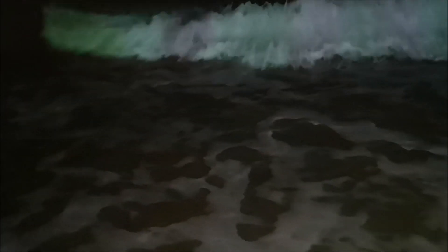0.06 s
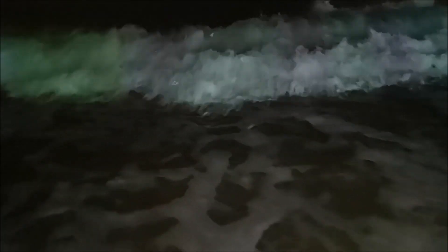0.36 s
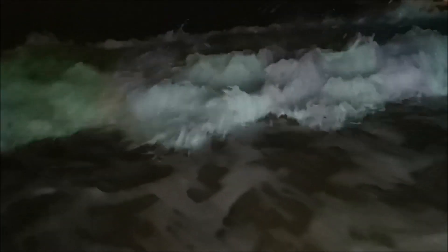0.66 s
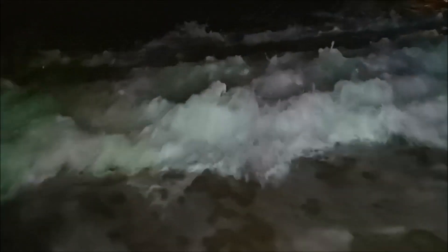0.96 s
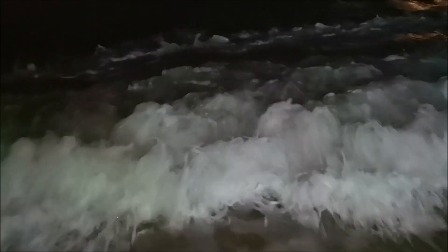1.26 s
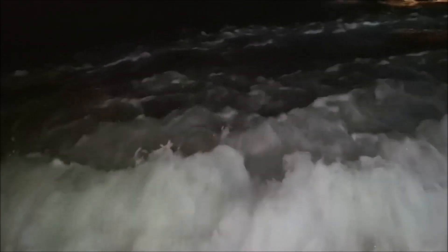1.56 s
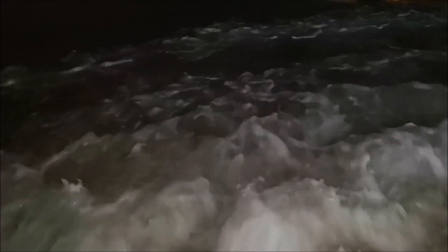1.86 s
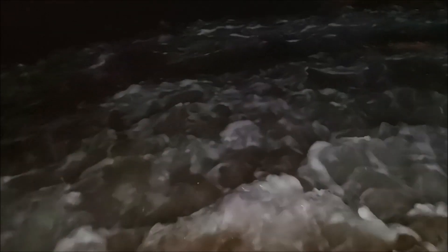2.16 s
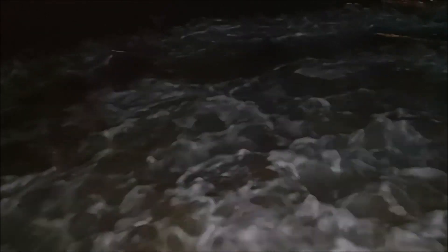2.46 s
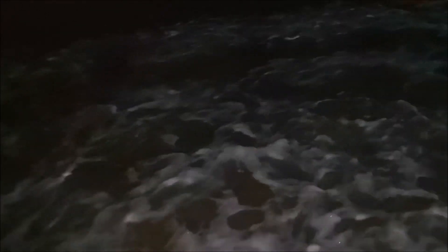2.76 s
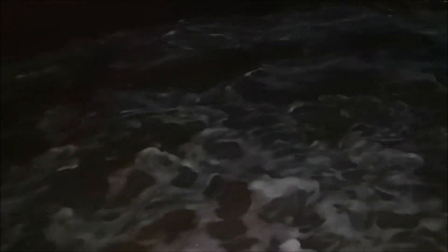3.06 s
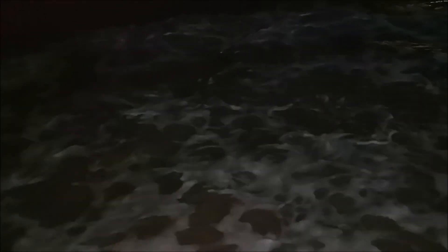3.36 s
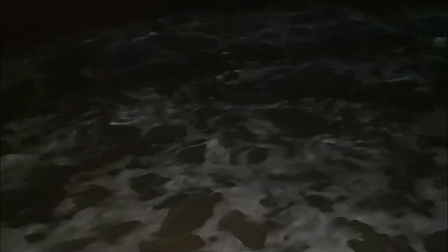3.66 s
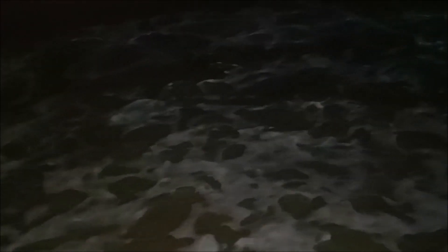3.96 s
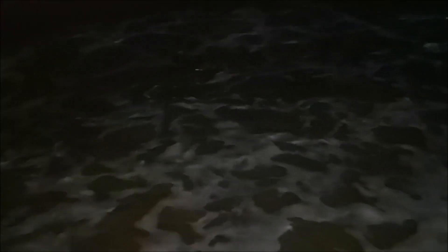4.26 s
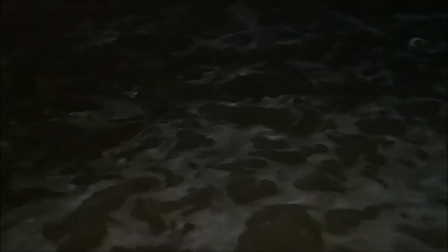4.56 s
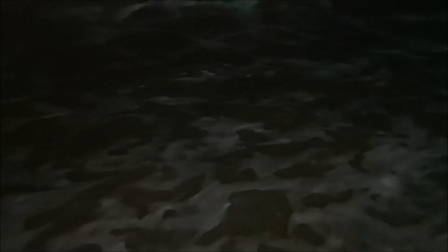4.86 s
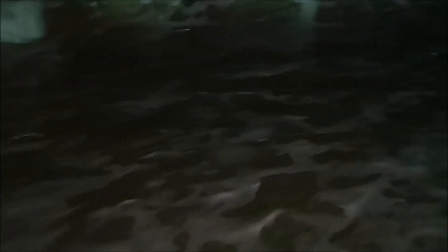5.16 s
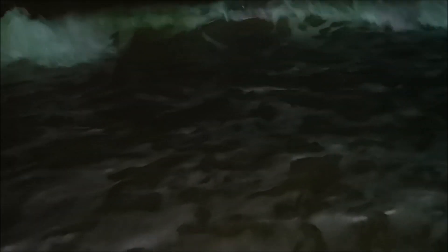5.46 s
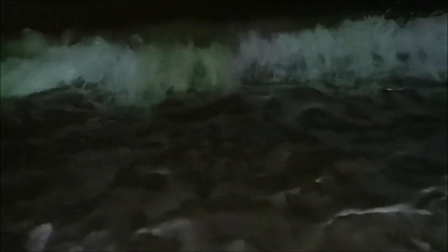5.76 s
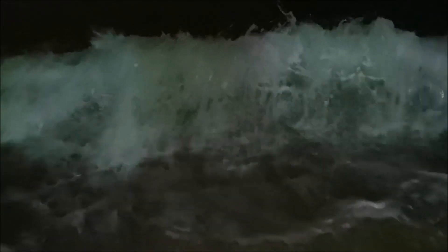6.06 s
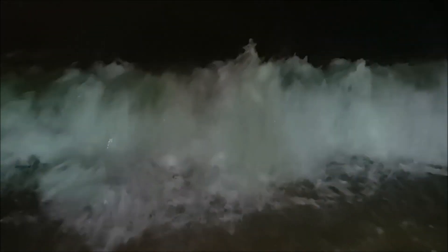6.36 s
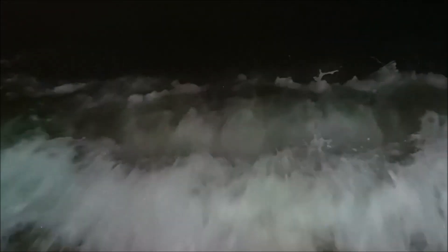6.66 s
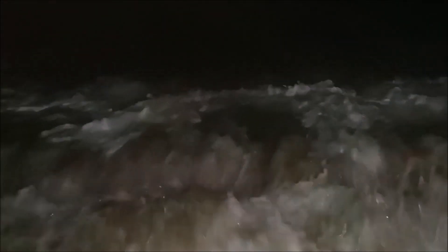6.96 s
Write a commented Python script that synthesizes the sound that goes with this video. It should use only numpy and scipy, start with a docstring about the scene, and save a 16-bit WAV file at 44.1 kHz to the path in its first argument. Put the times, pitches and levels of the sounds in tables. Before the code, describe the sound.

Waves break close by with a churning roar, wash up the shore and fizz out, then another crashes in.

```python
"""Night surf at the water's edge: a broken wave washes up the shore and fizzes out, then the next plunges.
Air in water resonates, the lower the larger its volume: big pockets thud, bubble clouds rumble, white
water roars and foam fizzes, as independent sources along a wide front. The shallows gurgle and plink
close by, and surf booms further along the shore. Two microphone ports a hand or two apart hear it,
each with its own resonances."""
import sys
import numpy as np
from scipy import signal
from scipy.fft import rfft, irfft
from scipy.io import wavfile
from scipy.ndimage import uniform_filter1d

SR = 44100
rng = np.random.default_rng(int(sys.argv[2]) if len(sys.argv) > 2 else 0)


def generate_wav(signal):
    """Clip the signal to [-1, 1] and save it as 16-bit WAV at the path in sys.argv[1]."""
    frames = np.transpose(np.atleast_2d(signal))
    scaled = np.clip(frames, -1, 1) * 32767
    pcm = np.round(scaled).astype(np.int16)
    wavfile.write(sys.argv[1], SR, pcm)


N = 317520
TIME = np.arange(N) / SR
FREQ = np.fft.rfftfreq(N, 1 / SR)


def undb(db):
    """Amplitude ratio of a level in decibels."""
    return 10 ** (np.asarray(db) / 20)


def curves(table):
    """Linear interpolation of a table's columns in time."""
    times, *columns = np.transpose(table)
    return [np.interp(TIME, times, column) for column in columns]


def colour(x, spectrum):
    """Spectral shaping by (f/Hz, level/dB) points, falling 12 dB an octave beyond the ends."""
    hz, db = np.transpose(spectrum)
    inside = np.clip(FREQ, hz[0], hz[-1])
    skirt = (np.minimum(FREQ, inside) / np.maximum(FREQ, inside)) ** 2
    return irfft(rfft(x) * skirt * undb(np.interp(np.log(inside), np.log(hz), db)), N)


def walk(rate):
    """Smooth random modulation of unit deviation, changing rate times a second."""
    hold = int(SR / rate)
    held = np.repeat(rng.standard_normal(N // hold + 2), hold)[rng.integers(hold):][:N]
    smooth = uniform_filter1d(held, hold)
    return smooth / smooth.std()


def steady(pair):
    """Normalisation: the running RMS of the two channels' mean is held at 1."""
    return pair / np.sqrt(uniform_filter1d(pair.mean(axis=0) ** 2, 5000))


def place(pair, db, lean_db=0):
    """Level panning: a gain of db, with the left lean_db above the right."""
    return pair * undb(db + np.array([[1], [-1]]) * lean_db / 2)


def swell(t, rise_s, fall_s):
    """Gaussian rise to 1 at time t, then exponential decay."""
    return np.exp(-(np.minimum(TIME - t, 0) / rise_s) ** 2 - np.maximum(TIME - t, 0) / fall_s)


def together(gains):
    """Incoherent sources add in power."""
    return np.sqrt(sum(gain ** 2 for gain in gains))


def pops(rate, spread_db):
    """Shot noise: rate bubbles a second are born at random, most faint, a few strong."""
    count = int(rate * N / SR)
    sizes = undb(spread_db * np.minimum(rng.exponential(size=count), 2 * np.pi))
    return np.bincount(rng.integers(N, size=count), sizes * rng.choice([-1, 1], count), N)


def foam(spectrum, rate, spread_db, flutter_db, patchy_db):
    """Uncorrelated noise of bursting bubbles: each port hears its own nearest patch."""
    shared_db = flutter_db * walk(14)
    pair = np.array([pops(rate, spread_db) * undb(shared_db + patchy_db * walk(30)) for _ in range(2)])
    return steady(colour(pair, spectrum))


def bubbles(table, glide):
    """Damped oscillators: each bubble dies to 1/23 in its cycles, rising in pitch near the surface."""
    pair = np.zeros((2, N))
    for t, hz, cycles, db, lean_db in table:
        start = int(t * SR)
        age = np.arange(int(2 * cycles * SR / hz))[:N - start] / SR * hz / cycles
        tone = np.sin(2 * np.pi * cycles * age * (1 + glide * age / 2)) * np.exp(-np.pi * age)
        pair[:, start:start + len(tone)] += place(tone, db, lean_db)
    return pair


# busiest stretch of the front: t/s, bearing to the right/rad, fraction of the power
FOCUS = [(0, 0.6, 0.07), (.75, 0.44, 0.2), (1.7, -0.92, 0.29), (2.6, -0.65, 0.58), (4.3, -0.6, 0.4),
         (4.8, -0.49, 0.67), (5.4, -0.43, 0), (5.6, 0.52, 0.1), (5.85, -0.1, 0.38), (6.25, 0.78, 0.22),
         (6.7, 0.023, 0.1), (7.2, -0.85, 0.13)]
def front(spectrum, rate, spread_db, surge_db, surge_rate, breadth=1, count=12):
    """Line source: each stretch surges on its own, and its bearing sets the lag between the ports."""
    side_lag_s = .00097  # port to port, for sound from the side
    bearing, share = curves(FOCUS)
    angles = np.pi * ((np.arange(count) + .5) / count - .5)
    busy = np.exp(-((angles[:, None] - bearing) / 0.18) ** 2)
    weights = np.sqrt((1 - share) / count + share * busy / busy.sum(axis=0))
    pair = np.zeros((2, N))
    for angle, weight in zip(angles, weights):
        stretch = pops(rate / count, spread_db) * weight * undb(surge_db * walk(surge_rate))
        lag = int(round(side_lag_s * SR * np.sin(breadth * angle)))
        pair[0] += np.roll(stretch, lag)
        pair[1] += stretch
    return steady(colour(pair, spectrum))


def follow(surf_db, db, slope):
    """Power law: a layer stands at db for surf at -30 dB and moves slope dB per dB of surf."""
    return db + slope * (surf_db + 30)


# falling crests: t/s, thud level/dB, crash level/dB, wash level/dB, spray level/dB, left - right/dB
BREAKS = [(.1, -35, -37.5, -55, -42, -2), (.3, -30.5, -37, -50, -40, 2), (4.48, -52, -62, -35, -48, -6),
          (4.65, -34, -35.5, -27, -34, 1), (5.13, -38, -37.5, -48, -35.5, 2),
          (5.62, -31, -31.5, -36, -33, -2.5), (5.73, -23, -27, -32, -30, -1),
          (5.97, -30.5, -50, -44, -48, 0), (6.52, -29, -26.5, -31.5, -32, 1.5),
          (6.82, -27.5, -37, -32.5, -40, 0), (6.97, -48, -32, -42, -31.5, -1),
          (7.13, -53, -32, -35, -33.5, -2)]
def with_breaks(rolling, layer, rise_s, fall_s):
    """Power summation of a layer's rolling gain and a burst for each falling crest."""
    column = ("thud", "crash", "wash", "spray").index(layer)
    bursts = [place(swell(t, rise_s, fall_s), levels[column], lean) for t, *levels, lean in BREAKS]
    return together([rolling] + bursts)


# spectrum of big air pockets: f/Hz, level/dB
THUD_SPECTRUM = [(12, -18), (25, -18), (40, -7.5), (60, -1.5), (85, 1), (115, -9.5), (170, -23), (300, -52)]
def thud(rumble_db):
    """Bubble resonance: the largest volumes of trapped air sound lowest."""
    noise = front(THUD_SPECTRUM, rate=3000, spread_db=1.6, surge_db=1.2, surge_rate=9, breadth=0.91)
    rolling = undb(follow(rumble_db, -36.5, slope=0.66))
    gain = with_breaks(rolling, "thud", rise_s=0.037, fall_s=0.19)
    return place(noise * gain, -.7 + 2 * walk(16))


# spectrum of bubble clouds: f/Hz, level/dB
RUMBLE_SPECTRUM = [(60, -34), (110, -0.5), (160, 0.5), (250, -1.5), (320, -4.5), (420, -13), (560, -22),
                   (900, -16), (1600, -52)]
def rumble(rumble_db, lean):
    """Collective oscillation: clouds of bubbles give a low band of noise."""
    noise = front(RUMBLE_SPECTRUM, rate=5000, spread_db=1.34, surge_db=1.8, surge_rate=12, breadth=0.61)
    return place(noise, rumble_db + .5 * walk(22), 0.083 * lean)


# spectrum of mid-sized bubbles: f/Hz, level/dB
CRASH_SPECTRUM = [(250, -13), (450, -10), (600, -5.5), (800, -5.5), (1150, -1.5), (1480, -1.7),
                  (1800, -0.5), (3000, -25), (6000, -43)]
def crash(wash_db, spill, lean):
    """Air entrainment: bubbles ring in the middle range, loudest as a crest falls."""
    noise = front(CRASH_SPECTRUM, rate=14000, spread_db=2, surge_db=1.4, surge_rate=14, breadth=0.99)
    rolling = undb(follow(wash_db, -33, slope=1.39) - 3 * spill)
    gain = with_breaks(rolling, "crash", rise_s=0.046, fall_s=0.14)
    return place(noise * gain, -.3, 0.47 * lean)


# spectrum of white water: f/Hz, level/dB
WASH_SPECTRUM = [(400, -48), (900, -10), (1350, -9), (1700, 0), (2400, 2.5), (2750, 0.5), (3150, -17),
                 (4200, -14.5), (7000, -25)]
def wash(gain, spill, lean):
    """Superposition: small bubbles merge into a roar, which loses the fraction spill of its power."""
    noise = front(WASH_SPECTRUM, rate=24000, spread_db=1.86, surge_db=0.9, surge_rate=28)
    return place(noise * gain * np.sqrt(1 - spill), -2, 2 * lean * (1 - spill))


# sheets of foam sweeping close by: peak t/s, rise/s, fall/s, level/dB
SHEETS = [(1.75, 0.41, 0.4, -33), (3.1, 0.55, .9, -44.5), (6.44, 0.48, 0.18, -30.5),
          (6.92, 0.28, 0.54, -31.5)]
def sheets(lag_s=0):
    """Envelope of the passing sheets, summed in power and delayed by lag_s."""
    return together([undb(db) * swell(t + lag_s, rise, fall) for t, rise, fall, db in SHEETS])


# spectrum of fizzing foam: f/Hz, level/dB
SPRAY_SPECTRUM = [(1500, -15.5), (3000, 2), (4100, -3.5), (5400, 1.5), (6500, -2), (8000, -2.5),
                  (9300, -4.5), (10300, -11), (12000, -17.5), (15000, -23)]
def spray(wash_db, lean):
    """Bubble bursting: the tiniest sound highest, with the wash, the sheets and each break."""
    noise = foam(SPRAY_SPECTRUM, rate=45000, spread_db=2.5, flutter_db=.5, patchy_db=0.87)
    fizz = together([undb(follow(wash_db, -34.5, slope=0.8)), sheets()])
    gain = with_breaks(fizz, "spray", rise_s=0.056, fall_s=0.058)
    return place(noise * gain, -2.5, 0.043 * lean + 0.13)


# spectrum of gurgling shallows: f/Hz, level/dB
GURGLE_SPECTRUM = [(200, -5), (330, -2), (480, -2.5), (650, -5.5), (900, -12.5), (1400, -15)]
def gurgle(swash_db):
    """Low bubble resonances in the shallows and in the wake of each sheet of foam."""
    noise = front(GURGLE_SPECTRUM, rate=2500, spread_db=2, surge_db=0.5, surge_rate=11)
    wake = undb(-8.5) * sheets(lag_s=0.39)
    return place(noise, 0, 1.6) * together([undb(swash_db - 3), wake])


# spectrum of nearby foam: f/Hz, level/dB
SIZZLE_SPECTRUM = [(2500, -5), (5500, 0), (8500, 1), (10500, -2.5), (12500, -7.5), (15000, -8.5)]
def sizzle(swash_db):
    """Treble shot noise of foam bursting on the shallows and on passing sheets."""
    noise = foam(SIZZLE_SPECTRUM, rate=25000, spread_db=1, flutter_db=0, patchy_db=1.5)
    gain = together([undb(swash_db), undb(-10.5) * sheets()])
    return noise * gain * undb(.7 * walk(17))


def plinks(swash_db, low_hz=885, high_hz=6700, cycles=20, count=1500):
    """Free oscillation of lone small bubbles scattered about the feet."""
    when, pitch, faintness, side = rng.random((count, 4)).T
    hz = low_hz * (high_hz / low_hz) ** pitch
    db = -0.5 * np.minimum(-np.log(1 - faintness), np.pi + 1)
    rows = zip(when * N / SR, hz, np.full(count, cycles), db, 16 * (2 * side - 1))
    pair = bubbles(rows, glide=0.14)
    return place(pair / pair.std(), swash_db - 12.5, 2)


# thin water about the feet, drawn away before the next wave: t/s, level/dB
SWASH = [(0, -48), (1.4, -49.5), (2.2, -53), (2.55, -50), (3.25, -44.5), (3.95, -47.5), (4.4, -49.5),
         (4.8, -51), (7.2, -54)]
def shallows():
    """Common modulation: gurgle, sizzle and plinks rise and fall with the swash."""
    swash_db, = curves(SWASH)
    return gurgle(swash_db) + sizzle(swash_db) + plinks(swash_db)


# spectrum of the far surf: f/Hz, level/dB
DISTANT_SPECTRUM = [(20, -13), (32, -8), (42, 2.5), (52, -17), (80, -15.5)]
# its heavier booms: t/s, level/dB
BOOMS = [(.1, -35), (.32, -31.5), (2.39, -33), (2.88, -36), (3.38, -36), (3.83, -35), (4.1, -36),
         (4.29, -36), (5.8, -26), (6.2, -31), (6.8, -29)]
def distant_surf():
    """Low-frequency noise from further along the shore: an uneven rumble and booms add in power."""
    noise = front(DISTANT_SPECTRUM, rate=2200, spread_db=2, surge_db=4.5, surge_rate=4)
    rolling = undb(-44.5 + 2 * walk(8.2))
    booms = [undb(db) * swell(t, rise_s=0.1, fall_s=0.076) for t, db in BOOMS]
    return place(noise * together([rolling] + booms), -1.7)


# drops of spray landing close by: t/s, f/Hz, decay/cycles, level/dB, left - right/dB
DROPS = [(1.551, 7150, 4.5, -26, 2), (2.5255, 7200, 3, -16, 3), (2.952, 5400, 18, -26, 3)]
def drops():
    """Impact excitation: each drop rings one tiny bubble."""
    return bubbles(DROPS, glide=.05)


# big single air pockets: t/s, f/Hz, decay/cycles, level/dB, left - right/dB
POCKETS = [(2.87, 134, 9.9, -28, 1), (4.63, 94, 17, -23, -4), (4.917, 222, 3.8, -19, -8),
           (5.142, 203, 11.4, -19.5, -4), (5.412, 119, 3.6, -31, 0), (5.612, 105, 9.5, -18.5, 0),
           (5.712, 71, 6.6, -17, 0), (5.77, 48, 3.3, -20, 0), (5.85, 90, 5.4, -20, -3),
           (5.908, 235, 21, -15, 0), (5.971, 186, 6.1, -12.5, -1), (6.503, 166, 5.7, -13.5, 0)]
def air_pockets():
    """Mass-spring resonance: air squeezed under the plunging lip is the spring, water the mass."""
    return bubbles(POCKETS, glide=0.21)


# spectrum of the spilling crest: f/Hz, level/dB
HOLLOW_SPECTRUM = [(450, -30), (650, -8.5), (950, -4), (1300, -42), (1700, -5.5), (2100, 5.5), (2600, -2),
                   (3200, -11.5), (5000, -18), (7400, -11), (9500, -29)]
def spilling_crest(gain, spill):
    """Noise in separate bands, ringing near 2 kHz, sounds hollow as the next crest spills, off to the left."""
    noise = foam(HOLLOW_SPECTRUM, rate=23000, spread_db=1.6, flutter_db=-0.6, patchy_db=1.5)
    return place(noise * gain * np.sqrt(spill), -6, lean_db=13)


# the rolling surf: t/s, bubble-cloud level/dB, white-water level/dB
SURF = [(0, -29.5, -33), (1.3, -30.5, -31.5), (1.8, -30, -30), (2.17, -37.5, -32), (2.52, -36.5, -39),
        (3.1, -38.5, -42), (4.38, -43.5, -44.5), (4.58, -41.5, -35), (4.77, -34, -33), (5.0, -34.5, -34),
        (5.47, -32, -35), (5.66, -28.5, -32), (5.98, -25.5, -32), (6.1, -28.3, -31), (6.62, -27, -29),
        (6.72, -27, -31), (7.08, -29.5, -29), (7.2, -38, -37.5)]
def breaking_wave():
    """Common modulation: bubbles of every size follow the surf, and the white water heaves as a whole."""
    rumble_db, wash_db = curves(SURF)
    bearing, _ = curves(FOCUS)
    lean = 1.44 - 2.5 * np.sin(bearing)  # leftward bias, scaled by each layer
    spill_from_s, spill_to_s, fade_s = 4.38, 5.58, 0.1
    spill = .8 * np.clip(np.minimum(TIME - spill_from_s, spill_to_s - TIME) / fade_s, 0, 1)
    wash_gain = with_breaks(undb(wash_db), "wash", rise_s=0.077, fall_s=0.17)
    bass = thud(rumble_db) + rumble(rumble_db, lean)
    white_water = (crash(wash_db, spill, lean) + wash(wash_gain, spill, lean)
                   + spray(wash_db, lean) + spilling_crest(wash_gain, spill))
    churn = undb(.3 * walk(26))
    return bass + white_water * churn


def scene():
    """Linear superposition of the wave in front, the water about the feet and the surf far off."""
    return breaking_wave() + shallows() + distant_surf() + drops() + air_pockets()


# resonances and shadows of each microphone port: f/Hz, width/Hz, gain/dB
LEFT_PORT = [(1840, 530, 3.5), (5820, 690, 3), (7020, 1280, 5.5), (7840, 860, 6), (10400, 1800, -5),
             (14000, 4000, 0)]
RIGHT_PORT = [(580, 240, -1), (943, 450, 1), (1980, 800, 5), (2980, 540, -5), (9280, 990, 4),
              (13000, 5500, 2.5)]
def record(dry):
    """Frequency response: each port's resonances and shadows, then a steep low-pass."""
    top_hz = 15200
    ports_db = [sum(db * 2 ** -((2 * (FREQ - hz) / width) ** 2) for hz, width, db in port)
                for port in (LEFT_PORT, RIGHT_PORT)]
    heard = irfft(rfft(dry) * undb(ports_db), N)
    return signal.sosfilt(signal.ellip(12, .1, 80, top_hz, fs=SR, output="sos"), heard)


dry = scene()
out = record(dry)
generate_wav(out)
```